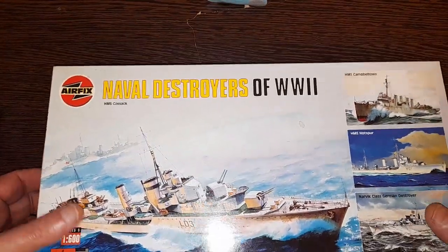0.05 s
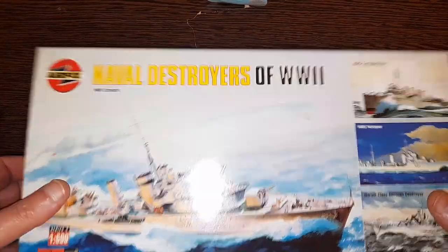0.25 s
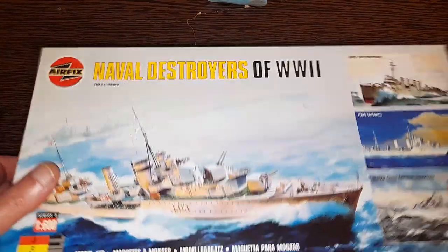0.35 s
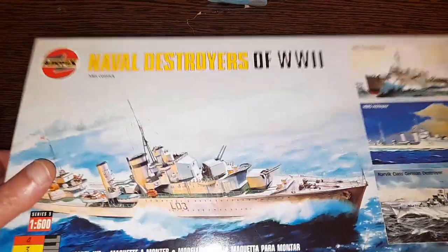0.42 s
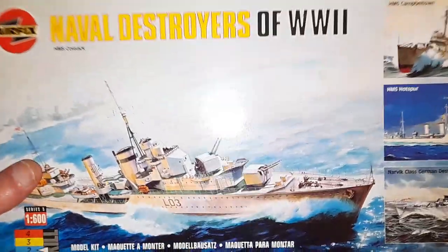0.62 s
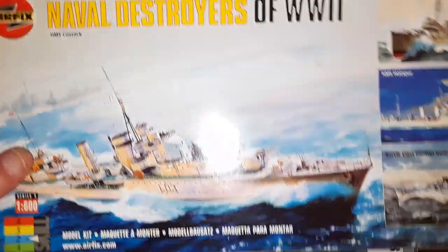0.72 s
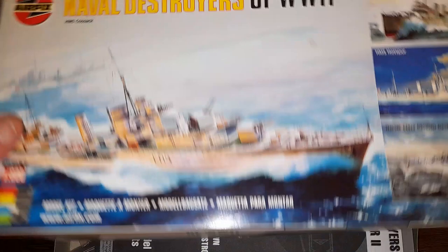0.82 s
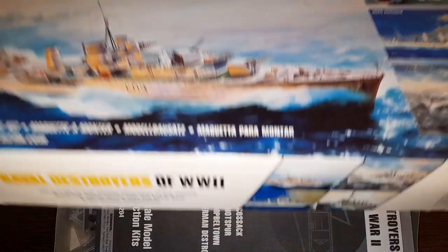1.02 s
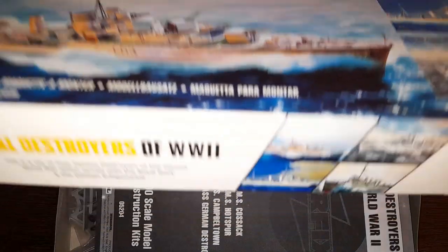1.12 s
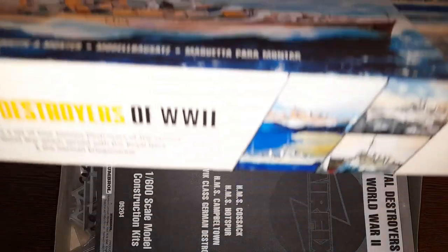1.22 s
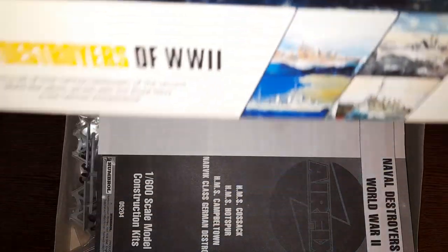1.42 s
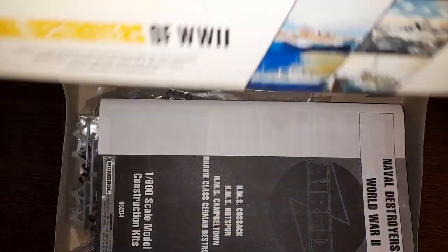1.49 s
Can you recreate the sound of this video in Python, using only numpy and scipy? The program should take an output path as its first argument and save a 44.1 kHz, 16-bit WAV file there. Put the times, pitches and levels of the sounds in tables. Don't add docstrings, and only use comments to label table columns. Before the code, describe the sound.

A cardboard box lid is pulled off, close up in a quiet room. From 0 to 0.2 s card rubs softly with small catches, growing into a scrape. Hollow knocks cluster from 0.2 to 0.47 s, loudest near 0.3 and 0.39 s, with cracks and wooden table thumps. After 0.6 s it is much quieter: lid pops around 0.82 s, light rustles and ticks near 0.95-1.15 s, faint crinkling, and a last rustle at 1.53 s.

```python
import sys
import numpy as np
from scipy import signal
from scipy.fft import rfft, irfft, next_fast_len
from scipy.io import wavfile
from scipy.ndimage import uniform_filter1d, map_coordinates

SR = 44100
rng = np.random.default_rng(int(sys.argv[2]) if len(sys.argv) > 2 else 0)


def amp(db):
    return 10 ** (np.asarray(db, float) / 20)


def to_wav(sig):
    pcm = np.clip(np.atleast_2d(sig), -1, 1) * 32767
    pcm = np.round(pcm).astype(np.int16)
    wavfile.write(sys.argv[1], SR, pcm.T)


N = 68355

# start_s, level_db, grip_db (slips over the rubbing)
SLIDING = [(0, -50, 14.5), (.05, -58, 1), (.112, -61, 15), (.17, -48.5, 9), (.212, -42, -1.5),
           (.258, -45.5, 1.5), (.3, -32.5, 12), (.375, -45, 8), (.41, -41, 5.5), (.45, -50.5, 4),
           (.61, -75.5, -7)]
# start_s, level_db
RIM_BRUSH = [
    (.711, -65.5),
    (.714, -56),
    (.75, -64),
    (.77, -66.5),
]
# pitch_hz, level_db, ring_s (time to fall 60 dB)
WALL_RING = [(297, -13, 0.0399), (440, -2.5, 0.097), (498.4, -2, 0.054), (569, -6.5, 0.024),
             (689, -11.5, 0.013), (894, -13, 0.12), (1064, -10, 0.056), (1470, -12, 0.052)]
# pitch_hz, level_db (per Hz)
RUB_COLOUR = [(410, -4.5), (700, -5), (747, -3.5), (1020, 0), (2490, -14.5), (5920, -20.5), (8100, -32),
              (14200, -26), (16000, -32.5)]


def sliding():
    wall_low_hz, bent_pitch = 273.8, 1.12
    slip_s = 0.00026
    rub_db, grip_db = curves(SLIDING)
    catch_db = 2.5 * wobble(80)
    strength = amp(rub_db + grip_db + catch_db) + amp(curves(RIM_BRUSH)[0])
    soft_slips = filtered(slips(1000, 3), lambda hz: 1 / (1 + 2j * np.pi * hz * slip_s) ** 2)
    force = strength * unit(soft_slips)

    bend = np.clip(.5 + .5 * wobble(25), 0, 1)
    flat = rung(force * np.sqrt(1 - bend), WALL_RING, wall_low_hz)
    bent = rung(force * np.sqrt(bend), np.multiply(WALL_RING, [bent_pitch, 1, 1]), wall_low_hz)
    hiss_db = rub_db + 10.5 + 1.32 * wobble(60)
    hiss = amp(hiss_db) * rush(RUB_COLOUR, patchy_db=1.0, grit=0.22)
    return amp(-33) * (flat + bent) + hiss


# start_s, level_db, contact_s, thump_db (of the table)
BOX_KNOCKS = [(0.202, -29, 0.0035, -39), (0.2129, -30.5, 0.0022, -42.5), (.2185, -24, 0.002, -27.5),
              (.232, -28.5, 0.00041, -39), (0.245, -34, 0.0025, -37.5), (0.2671, -21, 0.0017, -30.5),
              (.274, -32.5, 0.00028, -47), (0.2888, -16, .0003, -22.5), (0.2952, -9, 0.00088, -34),
              (0.2988, -13, 0.00072, -34.5), (0.308, -13, 0.0017, -44), (0.317, -15, 0.00081, -36),
              (0.323, -22.5, 0.0014, -38.5), (0.335, -21, 0.0014, -29), (.352, -16.5, 0.00056, -33),
              (.381, -25.5, 0.00071, -58), (0.392, -12, 0.0027, -13.5), (.397, -13.5, .0015, -40),
              (.407, -25.5, 0.0014, -29), (0.436, -20.5, 0.0014, -22), (.459, -27.5, 0.0023, -33.5),
              (0.473, -32, 0.0014, -27)]
# pitch_hz, level_db, ring_s
BOX_RING = [(236, -8.5, 0.21), (326.8, -1, 0.13), (402, -8, 0.06), (503.2, 3, 0.11), (582.4, -1, 0.054),
            (598, -7, 0.037), (662, -12, 0.16), (795.5, -9.5, 0.051), (1135, -7.5, 0.1), (1163, -2, 0.043),
            (1395, -9, 0.28), (1843, -30.5, .03), (2800, -30, .02)]
# pitch_hz, level_db, ring_s
TABLE_RING = [
    (55.13, -23.5, .12),
    (92.8, -2, 0.38),
    (98.4, -8.5, 0.28),
    (117, -5.5, 0.101),
    (158, -20, 0.069),
]
# pitch_hz, level_db (per Hz)
SNAP_COLOUR = [(290, -27.5), (500, 7.5), (1340, -13.5), (2610, -23), (4470, -26), (6700, -19),
               (8090, -36.5), (10400, -37), (16000, -39.5)]


def knocks():
    blows = [(start, db, contact) for start, db, contact, _ in BOX_KNOCKS]
    thumps = [(start, thump_db, .003) for start, _, _, thump_db in BOX_KNOCKS]
    box = amp(-6) * rung(pushes(blows), BOX_RING, low_hz=189)
    table = rung(pushes(thumps), TABLE_RING, low_hz=58.5)
    return box + table + cracks(blows, SNAP_COLOUR)


# start_s,
# level_db, pitch_hz, ring_s
TICKS = [(0.2906, -24.5, 2180, 0.039), (0.2888, -8.5, 1193, .03), (.113, -39, 440, .07),
         (.125, -36, 497, .06), (0.155, -32, 519, .06), (.168, -31, 540, .05),
         (0.182, -35.5, 470, .05), (.205, -29.5, 333.3, .05), (0.2198, -24, 308, 0.062),
         (.3935, -8.5, 357, 0.064), (.389, -31.5, 880, 0.034), (0.2127, -23, 545, 0.06),
         (0.435, -23.5, 500, 0.045), (0.2889, -29, 2850, 0.033), (.2903, -24, 3160, 0.026),
         (.2908, -20.5, 4400, 0.015), (0.2931, -36, 5800, 0.017), (0.2896, -34, 6300, 0.011),
         (0.2896, -16.5, 1470, 0.065), (0.706, -63.5, 5530, .015), (0.7138, -54, 5540, .02),
         (.714, -51, 1920, 0.029), (0.7187, -54.5, 5500, .02), (0.7225, -52, 1870, 0.069),
         (0.8143, -43, 1277, 0.038), (0.8236, -44, 2900, 0.023), (0.9128, -58, 1890, .02),
         (0.9227, -50, 1730, 0.028), (1.038, -47.5, 1820, 0.019), (1.0378, -50, 860, 0.036),
         (1.048, -51, 1747, 0.037), (1.1255, -52, 2260, 0.048)]


def ticks():
    t = np.arange(N) / SR
    side = rng.uniform(-0.48, 1, (len(TICKS), 1)) * [1, -1]
    total = np.zeros((2, N))
    for (start, db, hz, ring_s), lead in zip(TICKS, side):
        fading = amp(db - 60 * np.abs(t - start) / max(ring_s, .003)) * (t > start)
        phase = 2 * np.pi * hz * np.maximum(t - start, 0) + lead[:, None]
        total += fading * np.sin(phase)
    return total


# start_s, level_db (rustle), hum_db (over the rustle), bright_db (treble)
HANDLING = [(.604, -81.5, -25, -7), (.646, -63, 5.5, -7.5), (.695, -72.5, -0.5, -4), (.71, -68, -2, 0),
            (.715, -59.5, 16.5, -8.5), (.765, -64.5, 1, 2.5), (.79, -57.5, -6, 1.5),
            (.825, -61.5, 33, -2.5), (.895, -71.5, 22, 0.5), (.945, -52, 12.5, 3), (.988, -56.5, 1.5, -1),
            (1.062, -65.5, 23.5, -8), (1.112, -65.5, 8.5, -2), (1.143, -55.5, 5, 3.5),
            (1.158, -59.5, 3, -3.5), (1.272, -61.5, 11, -4.5), (1.33, -74, 6, -0.5), (1.47, -83.5, -9, -8),
            (1.52, -63, 0.5, 3), (1.55, -49.5, -2, -3.5)]
# pitch_hz, level_db, ring_s
LID_RING = [(276.7, -56, 0.091), (320.3, -4, 0.098), (423.8, -1, 0.088), (472, -17, 0.13),
            (665, -28, 0.045), (743, -18, 0.061), (1088, -16, 0.047), (1634, -10, 0.046)]
# pitch_hz, level_db (per Hz)
RUSTLE_COLOUR = [(350, -11.5), (600, -27), (670, -14.5), (1590, -2), (3250, -10.5), (6730, -10),
                 (8160, -21), (13900, -10.5), (16000, -22.5)]
LID_LOW_HZ = 263


def handling():
    level_db, hum_db, bright_db = curves(HANDLING)
    friction = amp(level_db + hum_db + 4.4 * wobble(39.5)) * unit(slips(900, 3.1))
    hum = amp(-34) * rung(friction, LID_RING, LID_LOW_HZ)

    noise = rush(RUSTLE_COLOUR, patchy_db=1.8, grit=.15)
    treble = filtered(noise, lambda hz: hz > 8500)
    coloured = noise + (amp(bright_db) - 1) * treble
    rustle = amp(level_db + 5.5 + 1.2 * wobble(48)) * coloured
    return hum + rustle


# start_s, level_db, contact_s
LID_POPS = [(.713, -65, 0.00056), (.737, -52, 0.0014), (.805, -42, 0.00068), (.8125, -28, 0.0014),
            (0.8227, -27.5, 0.00086), (.831, -39, 0.0006), (.844, -39.5, 0.00083), (0.93, -47, 0.0014),
            (.938, -47, 0.0012), (.946, -38, 0.0026), (0.956, -67, 0.002), (1.005, -45, 0.00049),
            (1.038, -43, 0.0005), (1.047, -39, 0.001), (1.051, -40.5, 0.0014), (1.063, -52, .0015),
            (1.535, -42.5, 0.0037)]


def pops():
    grip_start_s, grip_damps = .9, .45
    loose = [pop for pop in LID_POPS if pop[0] < grip_start_s]
    held = [pop for pop in LID_POPS if pop[0] >= grip_start_s]
    held_ring = np.multiply(LID_RING, [1, 1, grip_damps])
    ringing = rung(pushes(loose), LID_RING, LID_LOW_HZ) + rung(pushes(held), held_ring, LID_LOW_HZ)
    return ringing + amp(-10) * cracks(LID_POPS, RUSTLE_COLOUR)


# start_s, level_db
FOLD_CRINKLE = [
    (1.12, -66),
    (1.14, -46.5),
    (1.16, -63.5),
    (1.19, -59.5),
    (1.23, -77),
    (1.27, -60),
    (1.31, -79.5),
    (1.5, -84.5),
    (1.54, -57),
    (1.55, -59.5),
]
# pitch_hz, level_db, ring_s
FOLD_RING = [
    (1597, 0, .04),
    (2260, 10, 0.029),
    (4285, 0, 0.035),
    (6290, -13, 0.017),
    (6850, 8, .02),
]


def crinkle():
    snaps = amp(curves(FOLD_CRINKLE)[0]) * unit(slips(1500, 3))
    return amp(-28) * rung(snaps, FOLD_RING, low_hz=1200)


# start_s, level_db
AIR_STIR = [(.6, -67), (.73, -66), (.78, -76), (.85, -54), (.9, -68), (.94, -69), (1, -72), (1.05, -70),
            (1.13, -68), (1.19, -74), (1.28, -67), (1.36, -69), (1.43, -80), (1.55, -68)]
# pitch_hz, level_db (per Hz)
RUMBLE_COLOUR = [
    (25, -23),
    (60, -7),
    (130, 5),
    (200, -10.5),
    (300, -39.5),
]


def air():
    return amp(curves(AIR_STIR)[0]) * rush(RUMBLE_COLOUR, patchy_db=1)


# pitch_hz, ring_s
ROOM_RING = [
    (100, 0.51),
    (1000, 0.13),
    (10000, 0.43),
]


def room(x):
    low_hz = 203
    noise = rng.standard_normal((2, SR // 2))
    hz, t, z = signal.stft(noise, SR, nperseg=256)
    fading = amp(-60 * t / along(ROOM_RING, hz)[:, None])
    tail = signal.istft(z * fading, SR, nperseg=256)[1]
    tail = tail / np.linalg.norm(tail[0])
    delayed = np.pad(x, (200, 0))
    wet = signal.fftconvolve(delayed[None], tail, axes=1)[:, :N]
    return spread(wet, lambda hz: hz ** 2 / (hz ** 2 + low_hz ** 2))


# pitch_hz, level_db (per Hz)
HUSH_COLOUR = [
    (15, -45.5),
    (30, -19.5),
    (80, 9),
    (175, -16),
    (285, 4.5),
    (1100, -22),
    (5880, -23),
    (6740, -22),
    (16000, -15),
]


def hush():
    return amp(-63.5) * rush(HUSH_COLOUR, patchy_db=1.5)


def cracks(rows, spectrum):
    crack_db, ring_s, rise_s = 11, 0.024, 0.0011
    hard_s, hardness = 0.00036, 3
    t = np.arange(N) / SR
    level = np.zeros(N)
    for start, db, contact in rows:
        fading = (t > start) * amp(db + crack_db - 60 * np.abs(t - start) / ring_s)
        rise = np.clip((t - start) / rise_s, 0, 1)
        level += fading * (hard_s / contact) ** hardness * rise
    return level * rush(spectrum, patchy_db=2)


def pushes(rows):
    t = np.arange(N) / SR
    force = np.zeros(N)
    for start, db, contact in rows:
        push = np.sin(np.pi * np.clip((t - start) / max(contact, 1e-4), 0, 1)) ** 2
        force += amp(db) * push / push.sum()
    return force


def slips(rate, spread_db):
    happens = rng.random(N) < rate / SR
    size = amp(spread_db * np.clip(rng.standard_normal(N), -2, 2))
    return happens * size * rng.choice([-1, 1], N)


# pitch_hz, likeness (1 same, 0 unrelated)
LIKENESS = [
    (100, .68),
    (750, .72),
    (1200, .05),
    (15000, 0),
]


def half_angle(hz):
    return np.arccos(np.clip(along(LIKENESS, hz), -1, 1)) / 2


def rung(force, modes, low_hz):
    t = np.arange(SR // 2) / SR
    ring = np.zeros((2, len(t)))
    for k, (hz, db, ring_s) in enumerate(modes):
        turn = (-1) ** (k // 2) * half_angle(hz)
        lead = turn * np.array([[1], [-1]]) * (1 - np.exp(-t * hz))
        ring -= amp(db - 60 * t / max(ring_s, .005)) * np.sin(2 * np.pi * hz * t + lead)
    moved = signal.fftconvolve(force[None], ring, axes=1)[:, :N]
    return signal.sosfilt(signal.butter(3, low_hz, "high", fs=SR, output="sos"), moved)


def spread(pair, gain):
    def response(hz):
        return gain(hz) * [np.cos(half_angle(hz)), np.sin(half_angle(hz))]

    mid, side = filtered(pair, response)
    return np.array([mid + side, mid - side])


def rush(spectrum, patchy_db, grit=0):
    white = rng.standard_normal((2, N))
    white = white + grit * unit(slips(1300, 1.4))
    z = signal.stft(white, nperseg=256)[2]
    patches = uniform_filter1d(rng.standard_normal(z.shape[1:]), size=5, axis=0)
    patches = uniform_filter1d(patches, size=7, axis=1)
    pair = signal.istft(z * amp(patchy_db * unit(patches)), nperseg=256)[1][:, :N]
    return unit(spread(pair, lambda hz: amp(along(spectrum, hz))))


def unit(x):
    return x / np.sqrt(np.mean(x ** 2) + 1e-20)


def along(points, hz):
    f, v = np.transpose(points)
    return np.interp(np.log(hz + 1), np.log(f + 1), v)


def curves(rows):
    start, level, *others = np.transpose(rows)
    t = np.arange(N) / SR
    before = np.maximum(start[0] - t - .01, 0)
    after = np.maximum(t - start[-1] - .01, 0)
    level_db = np.interp(t, start, level) - 1000 * (before + after)
    return [level_db] + [np.interp(t, start, column) for column in others]


def wobble(rate):
    knots = rng.standard_normal(int(N * rate / SR) + 4)
    return map_coordinates(knots, [np.arange(N) * rate / SR])


def filtered(x, response):
    m = next_fast_len(N + SR)
    return irfft(rfft(x, m) * response(np.fft.rfftfreq(m, 1 / SR)), m)[..., :N]


def scene():
    left_db = -0.45
    near = sliding() + knocks() + ticks() + handling() + pops() + crinkle() + air()
    near = near + amp(-11.5) * room(near[0])
    return near * amp([[left_db], [-left_db]]) + hush()


def roll_off(x):
    return signal.sosfilt(signal.butter(12, 16220, fs=SR, output="sos"), x)


def record(dry):
    mix = np.clip(filtered(dry, lambda hz: hz < 16100), -1, 1)
    return roll_off(mix)


dry = scene()
out = record(dry)
to_wav(out)
```